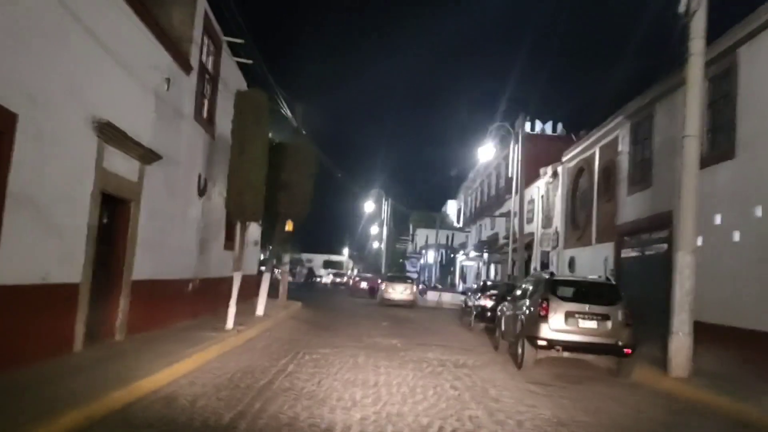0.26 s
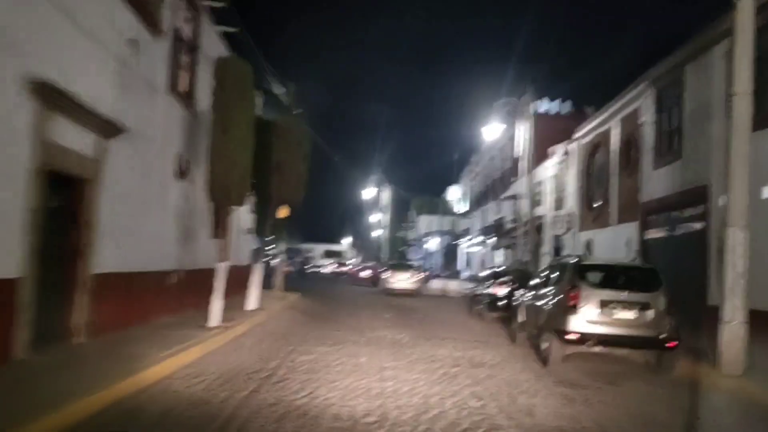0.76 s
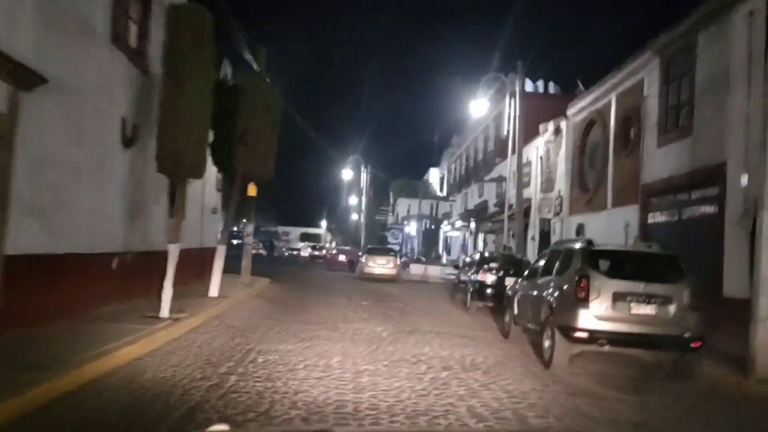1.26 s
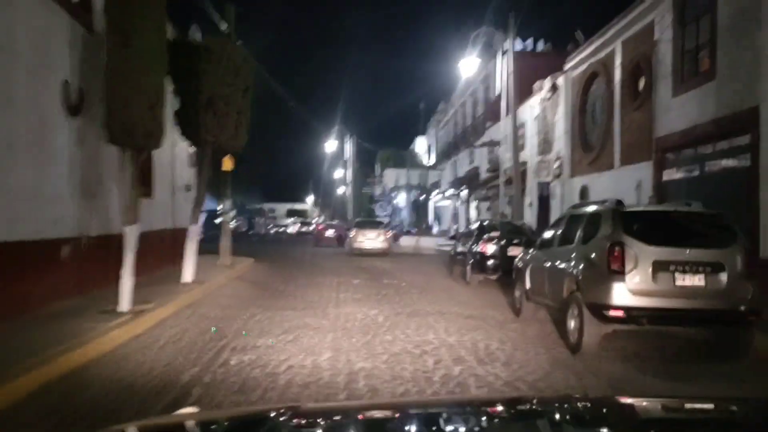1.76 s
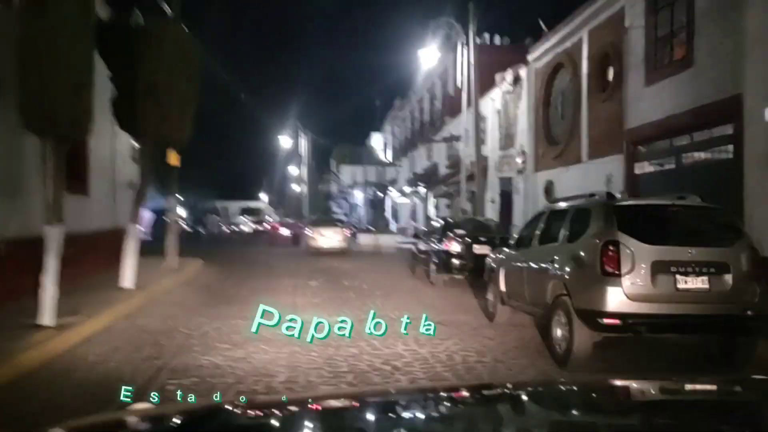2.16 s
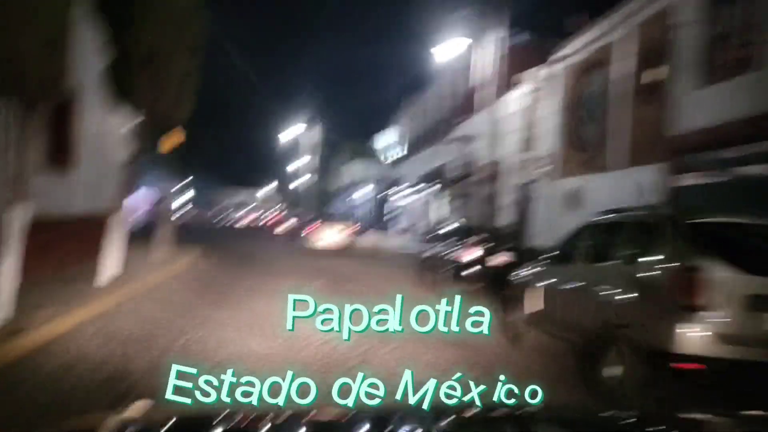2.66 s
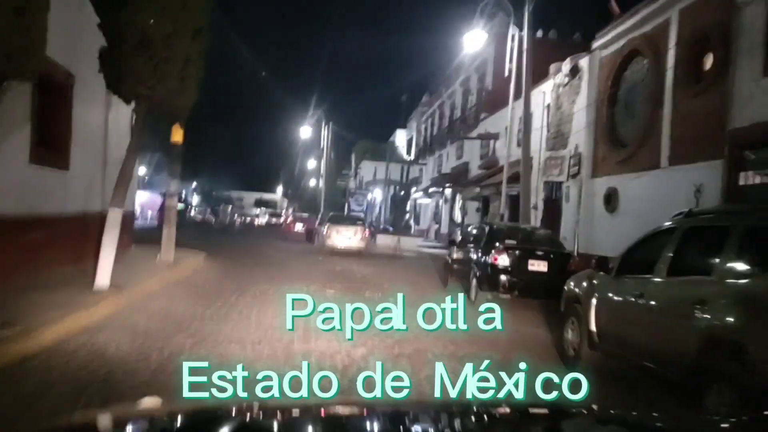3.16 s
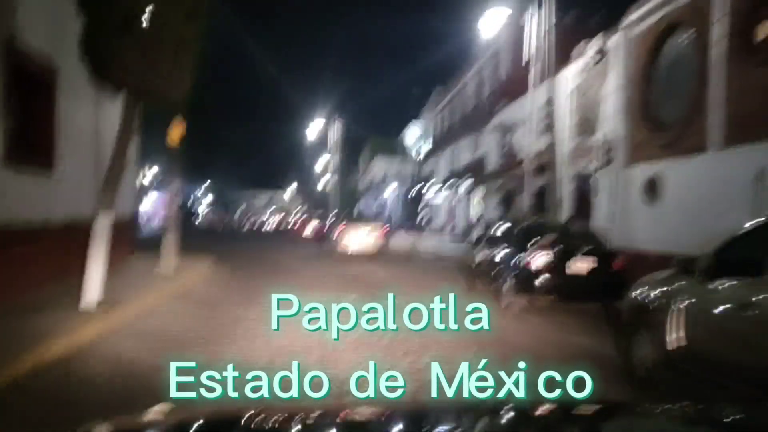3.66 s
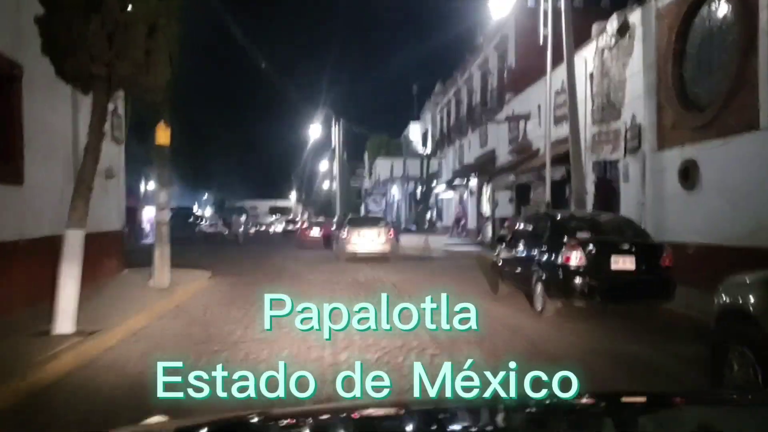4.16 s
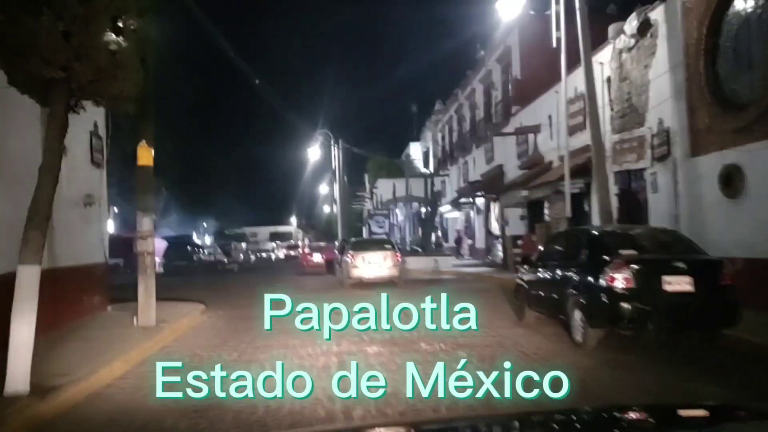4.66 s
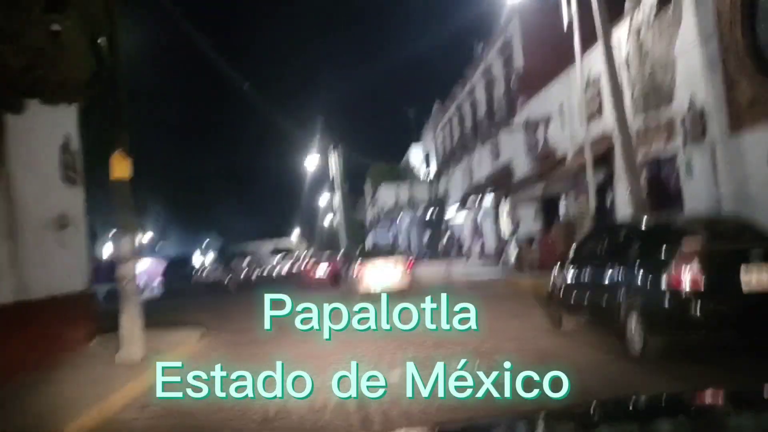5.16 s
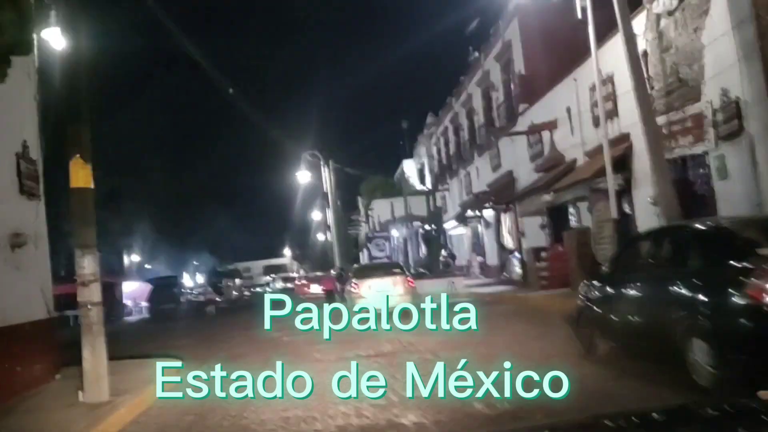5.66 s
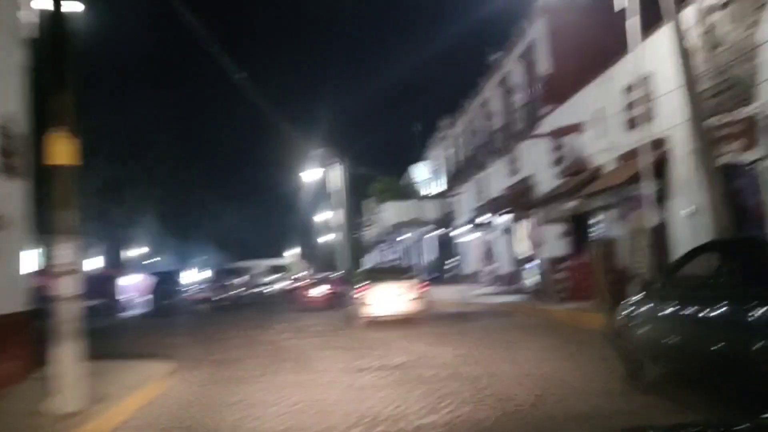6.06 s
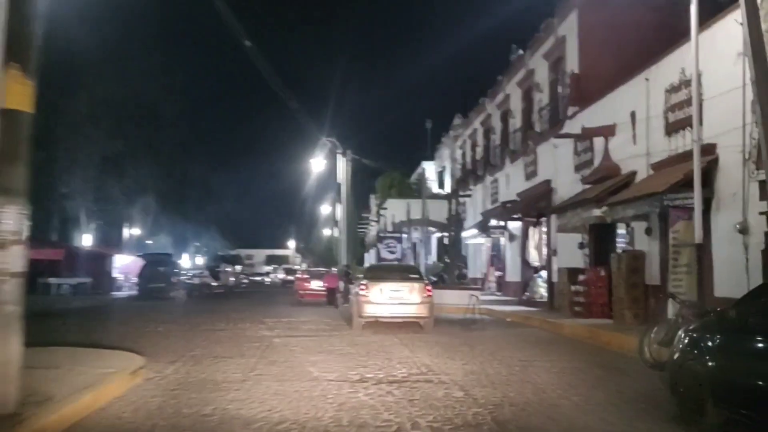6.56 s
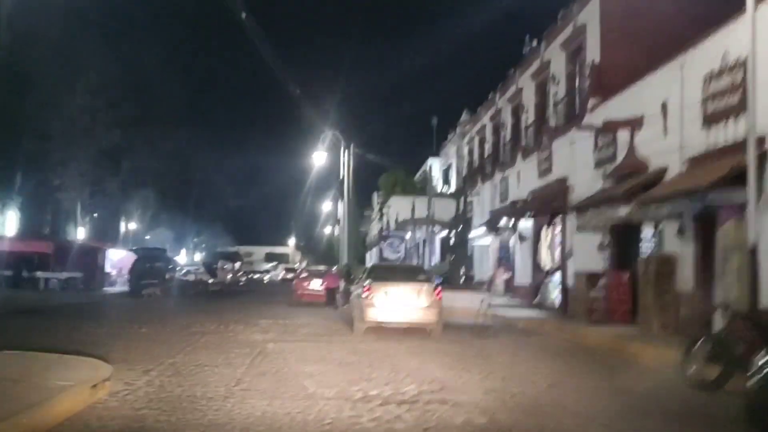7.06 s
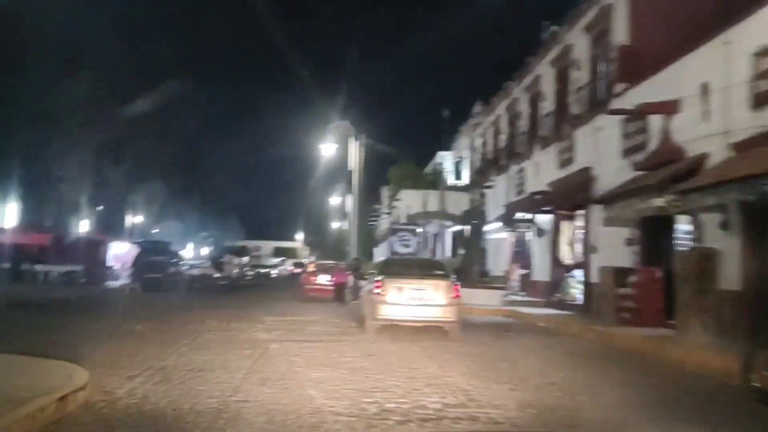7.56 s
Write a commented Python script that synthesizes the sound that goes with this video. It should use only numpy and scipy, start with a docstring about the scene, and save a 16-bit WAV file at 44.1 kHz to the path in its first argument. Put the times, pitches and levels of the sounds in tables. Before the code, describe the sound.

Inside a car on a cobbled street, tyres rumble and the body drums while plastic dashboard parts rattle and creak.

```python
"""Slow drive over cobbles

Heard by a phone in the cabin. Stones under the tyres shake the body into a boom and a drumming of
panels, and the tread roars through the floor. The dashboard hums and squeaks; loose trim rattles,
scrapes, knocks and snaps. A faint tone sounds near the end. The phone limits the loudest booms."""
import sys
import numpy as np
from scipy import signal
from scipy.fft import rfft, irfft, next_fast_len
from scipy.io import wavfile
from scipy.ndimage import uniform_filter1d, minimum_filter1d

SR = 44100
rng = np.random.default_rng(int(sys.argv[2]) if len(sys.argv) > 2 else 0)


def waveform_to_disk(signal):
    """Save audio, clipped to [-1, 1], as 16-bit WAV at the path in sys.argv[1]."""
    frames = np.transpose(np.atleast_2d(signal))
    scaled = np.clip(frames, -1, 1) * 32767
    samples = np.round(scaled).astype(np.int16)
    wavfile.write(sys.argv[1], SR, samples)


N = 343980
TIME = np.arange(N) / SR


def undb(db):
    """Decibels to amplitude."""
    return 10 ** (np.asarray(db) / 20)


def unit(x):
    """Scale to rms 1."""
    return x / np.sqrt(np.mean(x ** 2))


def smooth(x, size):
    """Two moving averages of size samples; rms 1."""
    return unit(uniform_filter1d(uniform_filter1d(x, size), size))


def highpass(x, hz, order):
    """Roll off the bass below hz."""
    return signal.sosfilt(signal.butter(order, hz, "high", fs=SR, output="sos"), x)


def curves(table):
    """Columns of a time table, sample by sample."""
    times, *columns = np.transpose(table)
    return [np.interp(TIME, times, column) for column in columns]


def ring(x, modes, flip=-1):
    """Sum of damped resonances (Hz, width Hz, dB); a negative flip alternates their signs."""
    out = 0
    for k, (hz, width, db) in enumerate(modes):
        pole = np.exp((2j * np.pi * hz - np.pi * width) / SR)
        mode = signal.lfilter([0, pole.imag], [1, -2 * pole.real, abs(pole) ** 2], x)
        out = out + flip ** k * undb(db) * mode
    return out


def colour(x, spectrum):
    """Filter to a spectrum of (Hz, dB) points; rms 1."""
    hz, db = np.transpose(spectrum)
    size = next_fast_len(N)
    bin_hz = np.maximum(np.arange(size // 2 + 1) * SR / size, 1)
    gain = undb(np.interp(np.log(bin_hz), np.log(hz), db))
    return unit(irfft(rfft(x, size) * gain, size)[:N])


def strikes(times, sizes):
    """Impulses of given sizes at given times."""
    x = np.zeros(N)
    np.add.at(x, np.minimum((np.asarray(times) * SR).astype(int), N - 1), sizes)
    return x


def grains(per_s, spread_db):
    """Impulses at random moments, of random sign, a few larger than the rest."""
    when, sign, big = rng.random((int(per_s * N / SR), 3)).T
    return strikes(when * N / SR, np.sign(sign - .5) * undb(-spread_db * np.log(1 - big)))


def wander(per_s):
    """A smooth drift through per_s random values a second; rms 1."""
    hold = int(SR / per_s)
    return smooth(np.repeat(rng.standard_normal(N // hold + 1), hold)[:N], hold)


def decays(events, t60, rise_s):
    """Envelope of bursts (start s, dB) that rise quickly and die away."""
    out = np.zeros(N)
    for start, db in events:
        t = TIME[int(start * SR):int((start + .3) * SR)] - start
        out[int(start * SR):][:len(t)] += undb(db) * (1 - np.exp(-t / rise_s)) * 1000. ** (-t / t60)
    return out


def steady(x, share):
    """Take a share of the chance swells out of a narrow ring; rms 1."""
    envelope = np.abs(signal.hilbert(x, next_fast_len(N))[:N])
    return unit(x / (envelope + 0.39 * np.std(x)) ** share)


def stone_ring(*stages, stones_per_s=400):
    """A stream of small stones drives resonances in series, already ringing at the start."""
    stones, lead_in = grains(stones_per_s, spread_db=2.0), SR // 4
    x = np.concatenate([stones[-lead_in:], stones])
    for modes in stages:
        x = ring(x, modes)
    return x[lead_in:]


# The deep note of the floor. Each row: pitch in Hz, width in Hz, gain in dB.
FLOOR_MODES = [(81.9, 7, 0)]
# The slightly higher notes of the roof. Each row: pitch in Hz, width in Hz, gain in dB.
ROOF_MODES = [(92.3, 23, -2.5), (107, 18, -5)]
# Swells over uneven stones. Each row: middle and length in seconds, floor and roof levels in dB.
BOOM_SWELLS = [(0.105, 0.13, -11, -16.5), (0.246, 0.08, -19, -10.5), (0.37, 0.13, -16, -12),
               (0.517, 0.12, -18, -8.5), (0.69, 0.039, -20, -4.5), (0.79, 0.13, -22, -19),
               (0.892, 0.12, -13, -26), (1.28, 0.029, -10, -14.5), (1.316, 0.17, -9.5, -27),
               (1.58, 0.47, -15.5, -33), (1.766, 0.04, -11, -32), (1.952, 0.035, -11, -4),
               (2.107, 0.12, -11.5, -17), (2.37, 0.19, -14, -9.5), (2.55, 0.045, -34, -8),
               (2.822, 0.17, -9.5, -15), (3.043, 0.13, -15, -12), (3.283, 0.079, -32, -12),
               (3.59, 0.18, -17, -19.5), (3.792, 0.094, -19, -20), (4.007, 0.052, -13, -13.5),
               (4.183, 0.11, -23, -22), (4.327, 0.14, -12, -30), (4.75, 0.11, -22, -33),
               (5.16, 0.083, -13.5, -21), (5.348, 0.091, -20, -6), (5.477, 0.059, -11, -11.5),
               (5.65, 0.1, -17.5, -24), (5.895, 0.084, -16.5, -10.5), (6.2, 0.38, -17, -27),
               (6.422, 0.05, -17, -13), (6.856, 0.14, -11, -12.5), (6.998, 0.062, -22, -17),
               (7.167, 0.037, -11, -9.5), (7.345, 0.15, -11.5, -33), (7.59, 0.054, -21, -5)]


def body_boom(floor_rest_db=-19, roof_rest_db=-21):
    """Stones keep floor and roof booming; each swell lifts them above their resting levels."""
    middle, length, floor_db, roof_db = np.transpose(BOOM_SWELLS)
    t = TIME[::64]
    bells = np.exp(-(2 * (t[:, None] - middle) / length) ** 4)

    def level(swell_db, rest_db):
        power = undb(rest_db) ** 2 + np.sum(undb(swell_db) ** 2 * bells, axis=1)
        return np.interp(TIME, t, np.sqrt(power))

    floor = steady(stone_ring(FLOOR_MODES, [(78.0, 28, 0)]), share=0.67)
    roof = steady(stone_ring(ROOF_MODES, [(106.2, 34, 0)]), share=0.67)
    boom = floor * level(floor_db, floor_rest_db) + roof * level(roof_db, roof_rest_db)
    return highpass(boom, hz=64, order=4)  # nothing rings below the floor mode


# The hollow notes of the body panels. Each row: pitch in Hz, width in Hz, gain in dB.
PANEL_MODES = [(129.8, 30, -0.5), (175.6, 27.7, 1.5), (191.3, 23.5, -1), (265, 47.6, -9), (326, 48, -13.5)]
# Fader moves that follow the road's roughness. Each row: time in seconds, then base levels in dB
# for panel drumming, tyre roar, trim buzz and fine rattle.
ROAD_LEVELS = [(0, -12, -20, -31.5, -40.5), (0.3, -12.5, -21.5, -35, -44), (0.66, -12.5, -21.5, -34.5, -42),
               (0.74, -13, -26, -40, -45.5), (1.27, -18, -25, -40, -48), (1.35, -16, -23.5, -35, -47),
               (1.65, -14.5, -22, -37.5, -48), (2.0, -22.5, -26, -37.5, -49), (2.35, -11, -27, -39, -48.5),
               (2.8, -16.5, -24.5, -38.5, -49), (3.4, -15, -24.5, -36.5, -50), (4.3, -19, -24, -39.5, -51),
               (4.8, -16.5, -24.5, -36.5, -49), (5.3, -16.5, -25.5, -42, -47), (5.7, -18, -27, -41, -48),
               (6.05, -14, -25, -42, -50), (6.35, -20.5, -25.5, -39, -47), (6.9, -17.5, -25, -38.5, -47),
               (7.35, -16, -26.5, -40.5, -46), (7.8, -21, -30, -38.5, -48.5)]


def panel_drumming(shake_db=6.9):
    """Small stones drum on the panels, harder just after each big one."""
    level_db = curves(ROAD_LEVELS)[0] + shake_db * aftershake()
    return stiff_mounts(undb(level_db) * steady(stone_ring(PANEL_MODES), share=0.13))


def stiff_mounts(x):
    """The mounts pass little of the panels' motion below their lowest mode."""
    return highpass(x, hz=100, order=2)


# The bounce of the suspension. Each row: pitch in Hz, width in Hz, gain in dB.
SUSPENSION_MODES = [(52, 20, 0)]


def wheel_rumble(level_db=-28):
    """Stones shake the wheels on their suspension: a low bed of rumble."""
    return undb(level_db) * unit(stone_ring(SUSPENSION_MODES, SUSPENSION_MODES))


# The dark roar of the tread. Each row: frequency in Hz, relative level in dB.
ROAR_SPECTRUM = [(140, -31), (230, 0.5), (322, -6.5), (389, -11), (576, -10), (746, -15), (1500, -24.5),
                 (1950, -72), (3300, -120)]
# The midrange buzz of the trim. Each row: frequency in Hz, relative level in dB.
BUZZ_SPECTRUM = [(710, -3), (1200, -0.5), (1330, -10.5), (1700, 2.5), (2550, -3), (2990, -8), (3300, -37.5),
                 (4290, -53.5), (7260, -120)]
# The fine, bright rattle on top. Each row: frequency in Hz, relative level in dB.
RATTLE_SPECTRUM = [(1940, -8.5), (3300, -2), (4690, -6.5), (5930, -12), (7220, -9), (7650, -12),
                   (7920, -17.5), (8300, -30.5), (10800, -60.5), (18300, -120)]


def roar_and_rattle():
    """The tread roars through the floor and trim rattles in two ranges, all shaken by the same jolts."""
    roar_db, buzz_db, rattle_db = curves(ROAD_LEVELS)[1:]
    jolt = wander(30)
    jolt = unit(jolt - uniform_filter1d(jolt, size=6000))  # quick jolts only, no slow swells
    parts = chatter(per_s=30, sharpness=37.3, count=70)
    shake, patch_db = aftershake(), rough_patches()

    roar = colour(rng.standard_normal(N) + 0.5 * parts, ROAR_SPECTRUM)
    roar_db += 0.28 * patch_db + 0.87 * shake + 0.41 * jolt + 0.66 * wander(15)

    clicks = unit(grains(per_s=900, spread_db=1.0))
    buzz = colour(rng.standard_normal(N) + 0.72 * clicks + 0.47 * parts, BUZZ_SPECTRUM)
    buzz_db += patch_db + 0.93 * shake + 0.73 * jolt

    rattle = colour(rng.standard_normal(N) + 0.28 * clicks + 0.5 * parts, RATTLE_SPECTRUM)
    rattle_db += 0.69 * patch_db + 1.1 * shake + 0.37 * jolt + 0.29 * wander(13)
    return roar * undb(roar_db) + buzz * undb(buzz_db) + rattle * undb(rattle_db)


def chatter(per_s, sharpness, count):
    """Many small loose parts, each ringing briefly at its own pitch whenever it is jogged."""
    return unit(sum(hz * ring(grains(per_s, spread_db=1), [(hz, hz / sharpness, 0)])
                    for hz in np.geomspace(300, 7800, count)))


# Rough patches that thicken the rattling. Each row: middle and length in seconds, lift in dB.
ROUGH_PATCHES = [(0.103, 0.069, -1.5), (0.273, 0.16, 2.5), (0.626, 0.086, 0), (1.04, 0.1, 4),
                 (1.643, 0.13, 3), (2.56, 0.36, 3), (3.174, 0.06, 1.5), (3.378, 0.17, 1), (4.06, 0.23, 3),
                 (4.338, 0.13, 7.5), (4.62, 0.051, 4.5), (5.364, 0.19, 4.5), (6.02, 0.15, 7),
                 (6.57, 0.09, 1), (6.793, 0.092, 3), (7.045, .1, 2.5), (7.256, 0.062, 1.5)]


def rough_patches():
    """A smooth bell of level in dB around each rough patch; a layer takes its own share of it."""
    middle, length, lift_db = np.transpose(ROUGH_PATCHES)
    t = TIME[::64]
    bells = np.exp(-(2 * (t[:, None] - middle) / length) ** 2)
    return np.interp(TIME, t, np.sum(lift_db * bells, axis=1))


# The two thin notes of the dashboard. Each row: pitch in Hz, width in Hz, gain in dB.
DASH_MODES = [(1658, 55, -1), (1963, 31, -6)]
# Fader moves for their hum. Each row: time in seconds, relative level in dB.
HUM_LEVELS = [(0.0, -49), (0.28, -42), (0.87, -56), (1.67, -32), (2.47, -39.5), (2.52, -43), (2.61, -39.5),
              (5.08, -38), (5.17, -55.5), (7.1, -48), (7.71, -53), (7.8, -49)]


def dashboard_hum(gain_db=-6):
    """Loose parts keep two dashboard resonances humming, in fits."""
    hum = unit(ring(grains(per_s=250, spread_db=1.5), DASH_MODES))
    return hum * undb(curves(HUM_LEVELS)[0] + gain_db + 0.73 * rough_patches() + 0.87 * wander(14))


# Tiny, high squeaks. Each row: top of the rise in seconds, level in dB, pitch in Hz.
DASH_SQUEAKS = [(0.015, -38, 5100), (0.0363, -47, 6840), (0.105, -38, 5000), (0.203, -39, 5200),
                (0.236, -40, 5140), (0.291, -36, 4220), (0.418, -37, 5240), (0.628, -35, 4950),
                (0.861, -43, 4250), (0.958, -42, 4230), (4.328, -39, 5180), (4.632, -46, 4600),
                (4.973, -41, 4340), (5.376, -40, 4900), (0.121, -34, 6950), (0.348, -35, 7230),
                (0.5387, -37, 7240), (1.0335, -39, 7230), (1.2131, -46, 7400), (1.26, -44.5, 6700),
                (1.6407, -38, 6600), (1.8652, -39, 6750), (1.9465, -39, 6540), (1.9876, -40, 6430),
                (2.334, -40.5, 6430), (2.4703, -40, 7000), (2.5546, -41, 6500), (2.592, -38, 7500),
                (2.814, -35, 6570), (2.854, -36, 7350), (2.8576, -36, 6620), (3.1572, -41, 7450),
                (3.425, -35, 6540), (3.4675, -41, 6500), (3.9599, -39, 6600), (4.0027, -40, 6800),
                (4.7647, -37.5, 7030), (4.772, -43, 6650), (4.785, -47, 7080), (5.0065, -39, 6600),
                (5.047, -40, 6640), (5.047, -45, 7200), (5.1637, -41, 6560), (5.3218, -38, 7100),
                (5.372, -37, 7300), (5.377, -36, 6700), (5.96, -44, 5270), (5.971, -43, 5750),
                (5.973, -40, 6750), (6.4677, -40, 6700), (6.48, -47, 6450), (6.5111, -39, 7100),
                (6.515, -42, 6540), (6.56, -45, 6700), (6.605, -46, 5600), (6.648, -46, 6550),
                (6.771, -43, 6600), (6.775, -44, 7400), (7.1182, -42, 6570), (7.7468, -45, 6450)]


def dashboard_squeaks(rise_s=0.0051, fall_s=0.012, stray_count=150, raspy_below_hz=6100):
    """Something loose squeaks in brief, rough tones, the lower ones raspy; faint strays fall between."""
    when, size, pitch = rng.random((stray_count, 3)).T
    strays = np.transpose([when * N / SR, -59 + 9 * size, 7500 - 3000 * pitch ** 2])
    t, out = TIME[:2048], np.zeros(N)
    rise = np.sin(np.pi / 2 * t / rise_s) ** 2
    fall = np.exp(-((t - rise_s) / fall_s) ** 2)
    envelope = np.where(t < rise_s, rise, fall)
    for top, db, hz in np.vstack([DASH_SQUEAKS, strays]):
        depth, grain_samples = (0.31, 60) if hz > raspy_below_hz else (0.8, 38)
        rasp = 1 - depth + depth * smooth(rng.standard_normal(len(t)), grain_samples)
        squeak = undb(db) * envelope * rasp * np.sin(2 * np.pi * hz * t)
        i = max(int((top - rise_s) * SR), 0)
        out[i:i + len(t)] += squeak[:N - i]
    return out


# Short scrapes of trim. Each row: start in seconds, level in dB.
SCRAPES = [(0.0194, -31), (0.1794, -33), (0.2194, -33), (0.2733, -32), (0.3381, -32.5), (0.4165, -39),
           (0.6104, -36), (0.628, -37), (0.861, -33.5), (0.958, -36.5), (1.036, -36.5), (1.3927, -34.5),
           (1.449, -37), (1.6132, -33.5), (1.6394, -35), (1.7669, -32), (2.0946, -39), (2.548, -32.5),
           (2.558, -31.5), (2.6359, -38), (2.8833, -36), (3.1677, -35), (3.2675, -37.5), (3.34, -31.5),
           (3.3872, -40.5), (3.4491, -36), (3.689, -32), (3.805, -37), (3.9794, -37.5), (4.055, -36),
           (4.3306, -35.5), (4.6144, -37), (4.969, -34), (5.1657, -42), (5.19, -40), (5.09, -38),
           (5.3009, -32), (5.352, -37), (5.374, -42), (5.4116, -36.5), (5.7094, -37.5), (6.01, -33),
           (6.095, -41), (6.16, -38), (6.531, -33.5), (6.6064, -40), (6.6994, -40), (6.7755, -38),
           (6.8094, -40), (7.2379, -40)]
# Their bright colour. Each row: frequency in Hz, relative level in dB.
SCRAPE_SPECTRUM = [(1200, -13.5), (2500, 14), (3500, 1.5), (5500, -1), (7500, -0.5), (8500, -47)]


def trim_scrapes():
    """Each scrape of trim is a burst of treble noise, patchy in pitch."""
    patchy = rng.standard_normal(N) + 0.18 * chatter(per_s=91, sharpness=55, count=30)
    return colour(patchy, SCRAPE_SPECTRUM) * decays(SCRAPES, t60=0.13, rise_s=0.0012)


# Knocks of loose trim. Each row: start in seconds, peak level in dB, pitch in Hz.
TRIM_KNOCKS = [(0.089, -8.5, 630), (0.168, -12, 530), (0.223, -8, 510), (0.226, -10.5, 786),
               (0.2697, -25, 2030), (0.276, -15, 496), (0.3366, -20, 1810), (0.629, -24, 2400),
               (0.632, -14, 570), (0.917, -15, 594), (0.959, -17.5, 470), (0.995, -12.5, 566),
               (1.034, -25, 1300), (1.45, -22, 503), (1.5015, -21, 1100), (1.532, -21.5, 2020),
               (1.604, -21, 452), (1.62, -27, 1570), (1.634, -20, 2010), (1.654, -13, 700),
               (1.848, -25, 1720), (1.9, -24, 1790), (2.0956, -18.5, 2080), (2.096, -16, 750),
               (2.1208, -20, 1990), (2.161, -18.5, 1840), (2.206, -20, 1920), (2.2503, -22, 1800),
               (2.3426, -27, 2100), (2.451, -24, 1740), (2.519, -13.5, 1780), (2.558, -17, 2520),
               (3.1168, -18, 1560), (3.339, -24, 2320), (3.344, -12, 500), (3.3845, -19.5, 2080),
               (3.459, -25, 2650), (3.693, -19.5, 1500), (3.7578, -21.5, 1740), (3.938, -16, 450),
               (4.011, -21.5, 1520), (4.027, -18, 1010), (4.0434, -18, 1680), (4.046, -24, 457),
               (4.3096, -27, 2100), (4.327, -19, 1150), (4.3457, -21, 2050), (4.585, -24, 1520),
               (4.94, -23.5, 2050), (5.37, -17, 600), (5.706, -29, 2000), (6.019, -27, 1980),
               (6.2632, -20, 1950), (6.535, -20.5, 1770), (6.6008, -19.5, 2010), (7.0555, -19.5, 1920),
               (7.056, -22, 1360), (7.228, -12, 553), (7.237, -9, 456)]


def trim_knocks(rattle=0.49, t60=0.09, grit_db=2.5):
    """Each knock is a blow and a short gritty rattle in a resonance of the trim."""
    t, out = TIME[:8192], np.zeros(N)
    for start, db, hz in TRIM_KNOCKS:
        grit = rng.standard_normal(len(t)) * undb(grit_db * np.repeat(rng.standard_normal(64), 128))
        push = rattle * grit * 1000. ** (-t / t60)
        push[0] = 5.0  # the blow itself
        width_hz = 160 + hz / 4.9
        knock = ring(ring(push, [(hz, width_hz, 0)]), [(hz, 3.1 * width_hz, 0)])
        i = int(start * SR)
        out[i:i + len(t)] += undb(db) * knock[:N - i] / np.abs(knock).max()
    return out


# Single big stones. Each row: start in seconds, relative strength of the blow in dB.
BIG_STONES = [(0.182, -10), (0.231, -6.5), (0.444, 2.5), (0.471, -1), (0.842, -5.5), (1.013, 0.5),
              (1.38, -9), (1.559, 1), (1.878, 2), (1.987, -1.5), (2.272, 5.5), (2.353, -18), (2.76, -3.5),
              (3.051, -8), (3.265, -3.5), (3.304, 2.5), (3.589, -4), (3.992, -3), (4.08, -2.5),
              (4.177, -2.5), (4.266, -5), (4.352, 2.5), (4.611, -2), (4.832, 1.5), (5.126, -8.5),
              (5.245, 2.5), (5.333, 1.5), (5.697, -1.5), (5.895, 1.5), (6.084, -7.5), (6.352, 4),
              (6.662, -8), (6.753, -5.5), (6.932, -7), (6.957, 0), (7.146, -3.5), (7.359, -19),
              (7.401, -8.5), (7.564, -6)]


def stone_thumps(panel_db=-6.5, roof_db=-11.5):
    """Big stones thump the panels and the roof."""
    starts, db = np.transpose(BIG_STONES)
    blows = uniform_filter1d(strikes(starts, undb(db)), size=90)  # rubber spreads a blow over 2 ms
    panels = undb(panel_db) * ring(blows, PANEL_MODES, flip=0.94)
    roof = undb(roof_db) * ring(blows, ROOF_MODES, flip=0.84)
    return stiff_mounts(panels + roof)


def aftershake():
    """Each big stone leaves the body shaking for a moment: an envelope from 0 to 1."""
    return np.tanh(decays(BIG_STONES, t60=0.42, rise_s=0.0053))


# Hard plastic snaps. Each row: start in seconds, chirp peak in dB, dull crack peak in dB.
PLASTIC_SNAPS = [(1.889, -29, -36), (1.9888, -31, -18), (3.1168, -24, -26), (3.123, -29, -32),
                 (3.7008, -23, -19), (5.04, -29, -35), (5.9515, -37.5, -42)]
# The panel notes under each crack. Each row: pitch in Hz, width in Hz, gain in dB.
CRACK_MODES = [(1600, 500, 13.7), (2740, 720, 16)]


def plastic_snaps(from_hz=7940, to_hz=3900, sweep_s=0.0028, crack_t60=0.012):
    """A snap's treble runs ahead through the plastic, a falling chirp; a duller crack rings the panel."""
    t, out = TIME[:1024], np.zeros(N)
    along = np.minimum(t / sweep_s, 1)
    hz = from_hz + (to_hz - from_hz) * along
    chirp = np.sin(np.pi * along) * np.sin(2 * np.pi * np.cumsum(hz) / SR)
    for start, chirp_db, crack_db in PLASTIC_SNAPS:
        burst = rng.standard_normal(len(t)) * 1000. ** (-t / crack_t60)
        crack = ring(ring(burst, CRACK_MODES), [(2240, 2300, 0)])
        crack /= np.abs(crack).max()
        out[int(start * SR):][:len(t)] += undb(chirp_db) * chirp + undb(crack_db) * crack
    return out


# The path of one short tone. Each row: time in seconds, pitch in Hz, level in dB.
TONE_PATH = [(6.92, 602, -29), (7.042, 605, -29.5), (7.09, 603, -42)]


def faint_tone():
    """A soft sine, faded in and out."""
    hz, db = curves(TONE_PATH)
    sounding = (TIME > TONE_PATH[0][0]) & (TIME < TONE_PATH[-1][0])
    fade = uniform_filter1d(sounding.astype(float), size=800)
    return np.sqrt(2) * fade * undb(db) * np.sin(2 * np.pi * np.cumsum(hz) / SR)


def scene():
    """The rolling bed and the single hits meet at one microphone."""
    bed = body_boom() + panel_drumming() + wheel_rumble() + roar_and_rattle() + dashboard_hum()
    hits = stone_thumps() + trim_knocks() + plastic_snaps() + trim_scrapes() + dashboard_squeaks()
    return (bed + hits + faint_tone())[None]


def limiter(x, ceiling=1.008, window=1301):
    """Gain dips smoothly around any peak that would pass the ceiling; the window is about 30 ms."""
    gain = np.minimum(1, ceiling / (np.abs(x) + 1e-9))
    return x * uniform_filter1d(minimum_filter1d(gain, window), window)


def record(dry, top_hz=8700, hiss_db=-80, hiss_top_hz=15500):
    """The phone cuts deep bass and treble, limits the booms, shaves their tips and hisses faintly."""
    x = highpass(dry, hz=34, order=4)
    x = signal.sosfilt(signal.butter(5, 7800, fs=SR, output="sos"), x)
    x = signal.sosfilt(signal.ellip(8, .05, 45, top_hz, fs=SR, output="sos"), x)
    x = np.clip(limiter(x), -1, 1) + undb(hiss_db) * rng.standard_normal(x.shape)
    x = signal.sosfilt(signal.ellip(8, .01, 40, hiss_top_hz, fs=SR, output="sos"), x)
    return np.clip(x, -1, 1)


dry = scene()
out = record(dry)
waveform_to_disk(out)
```